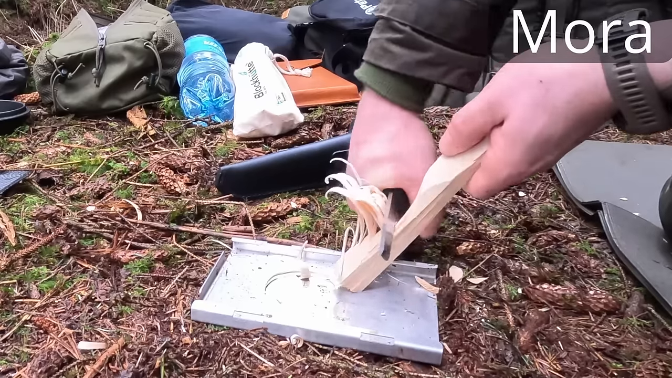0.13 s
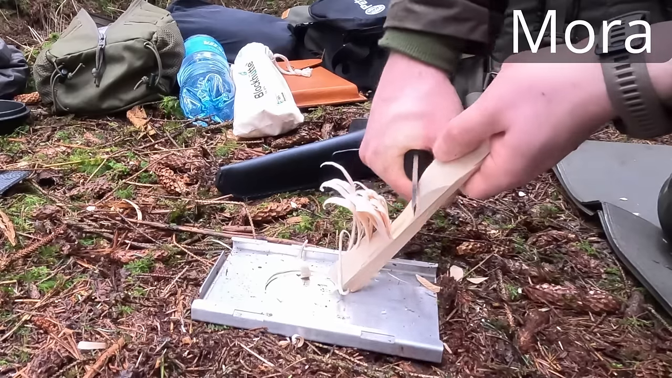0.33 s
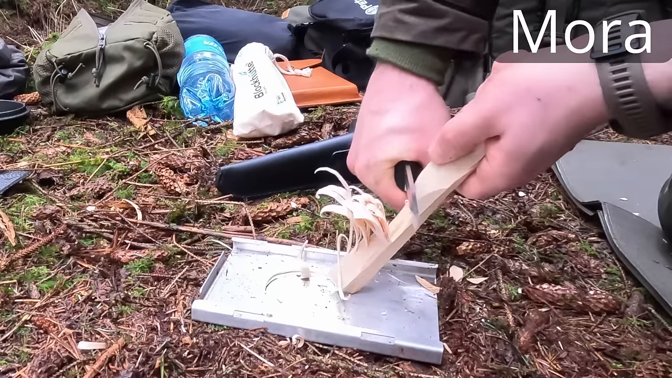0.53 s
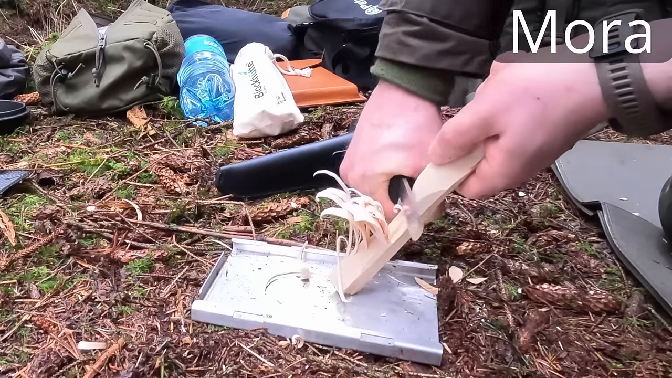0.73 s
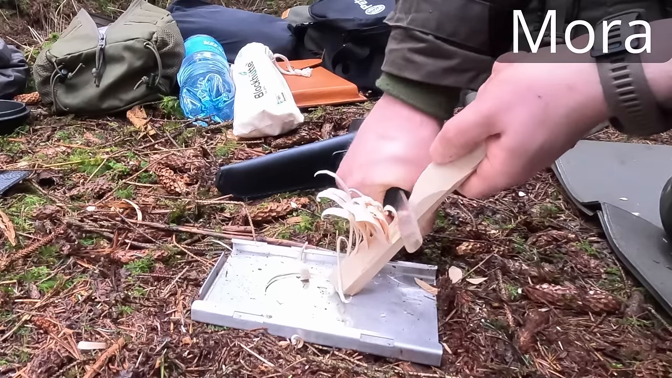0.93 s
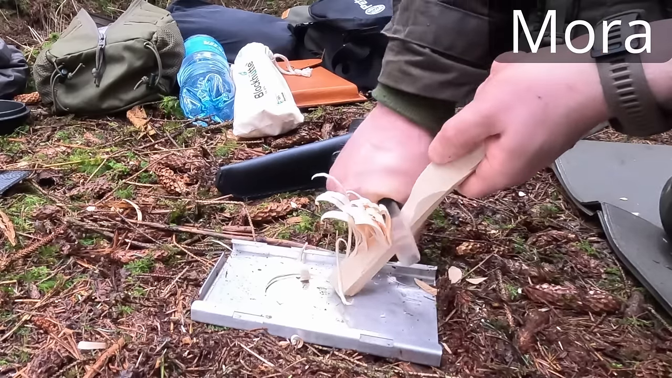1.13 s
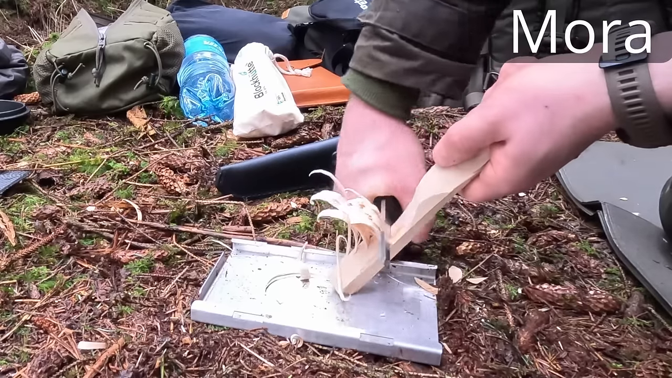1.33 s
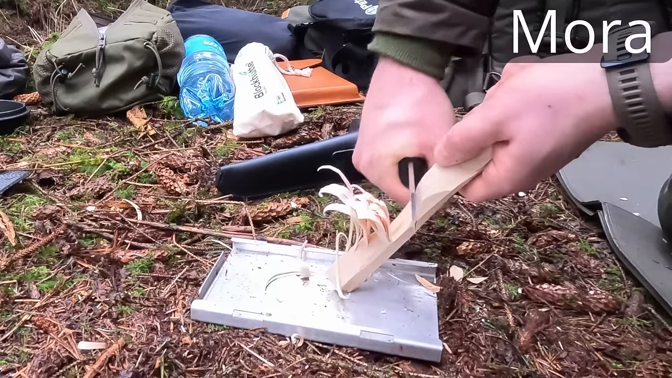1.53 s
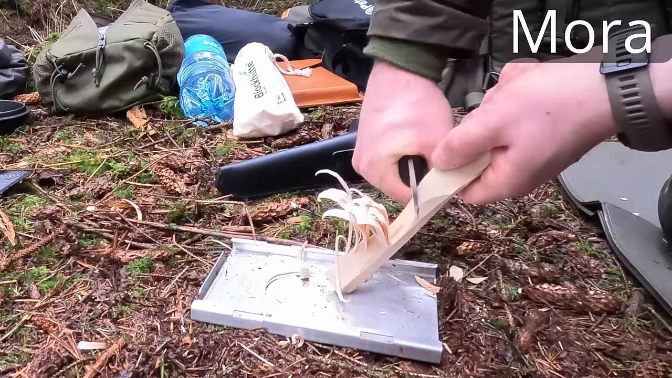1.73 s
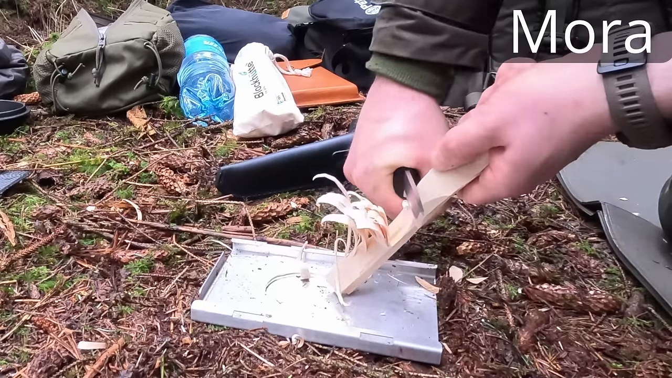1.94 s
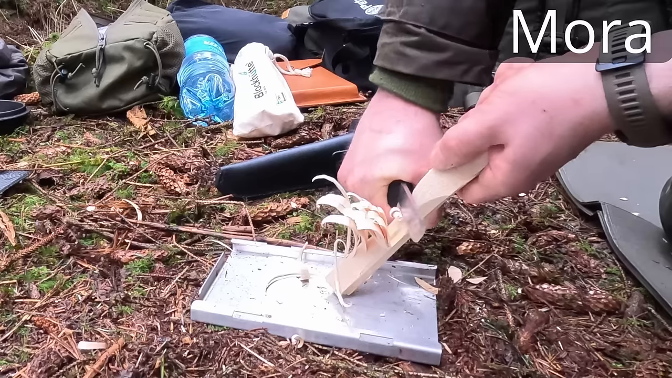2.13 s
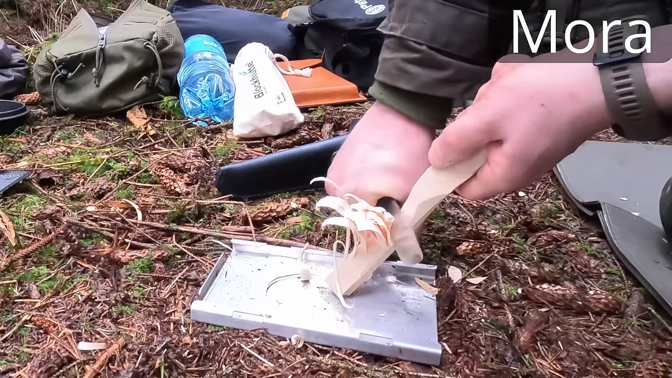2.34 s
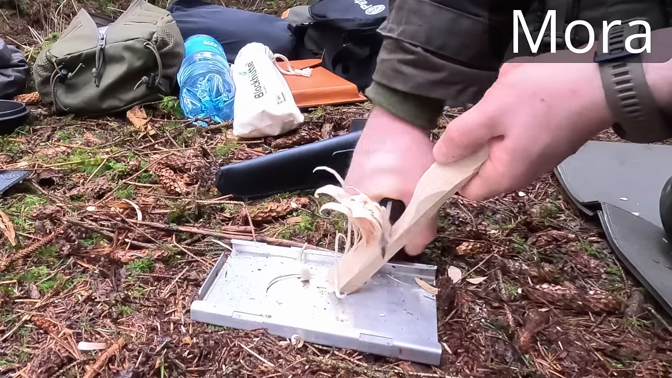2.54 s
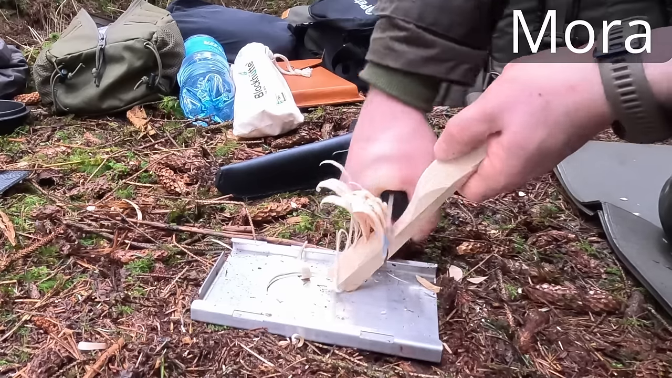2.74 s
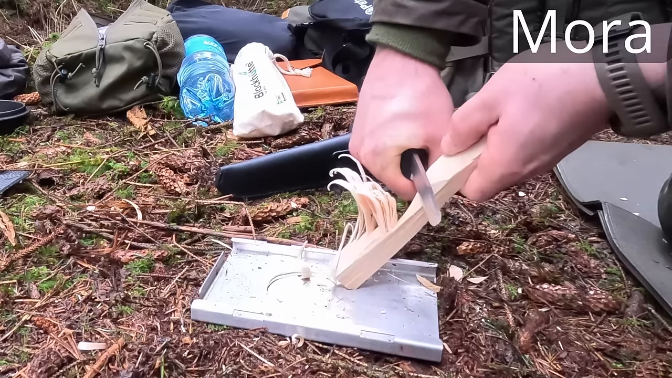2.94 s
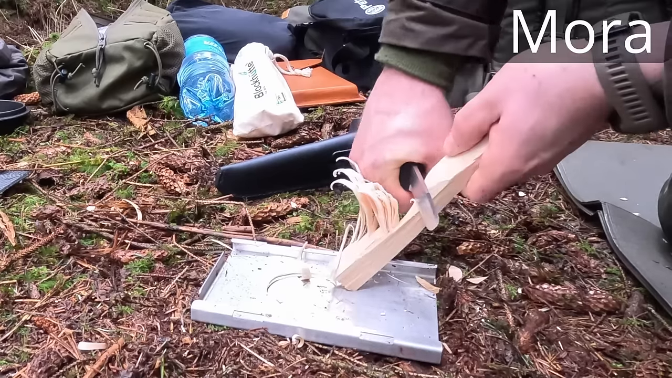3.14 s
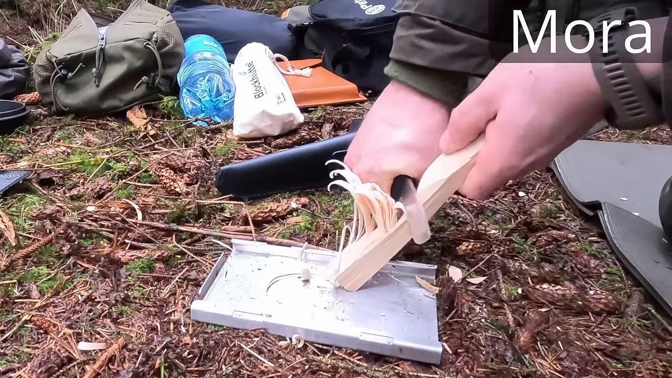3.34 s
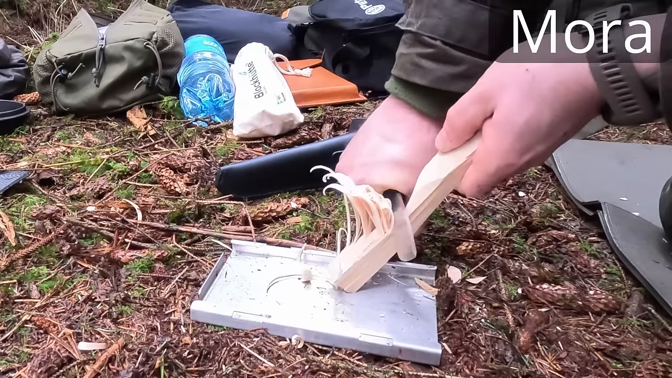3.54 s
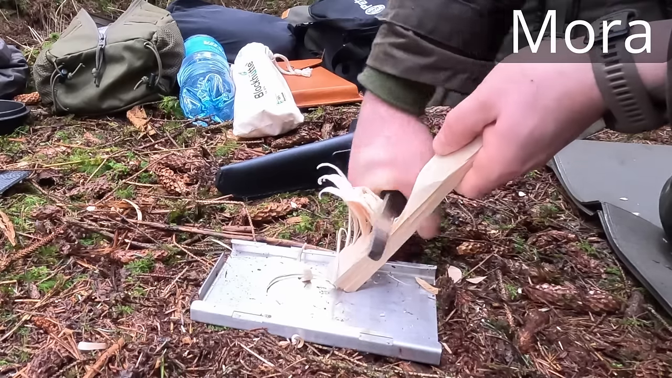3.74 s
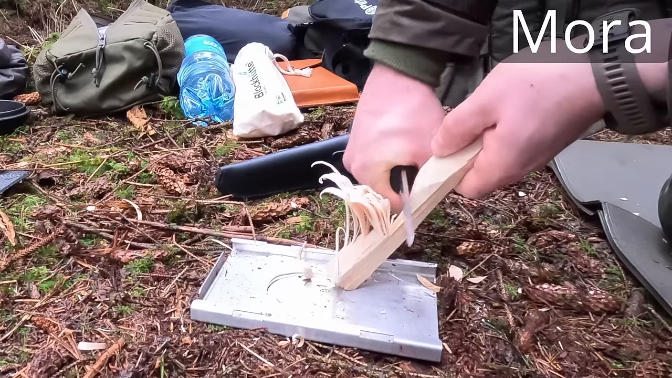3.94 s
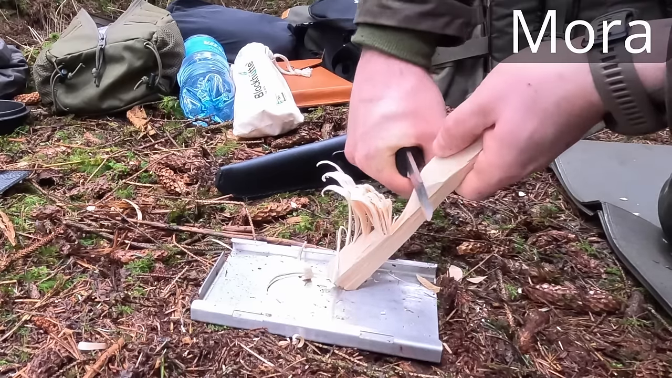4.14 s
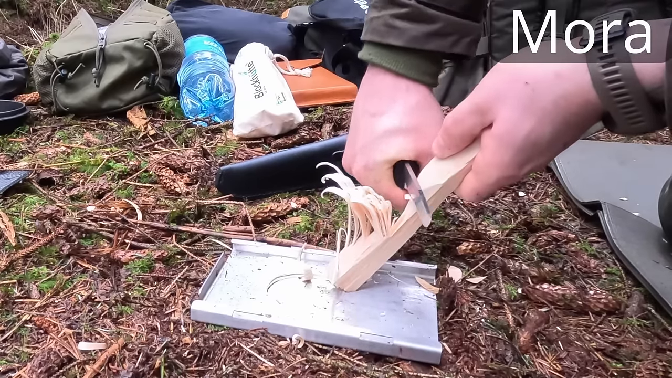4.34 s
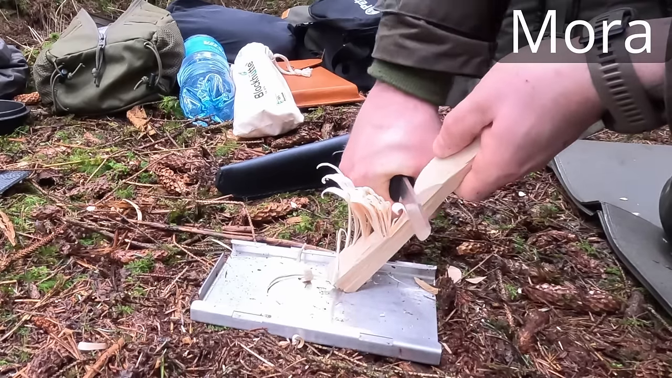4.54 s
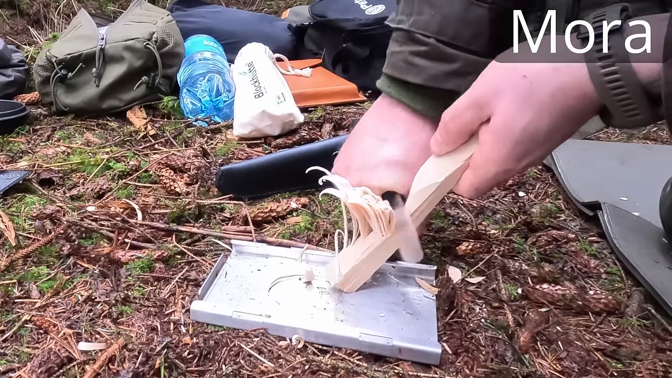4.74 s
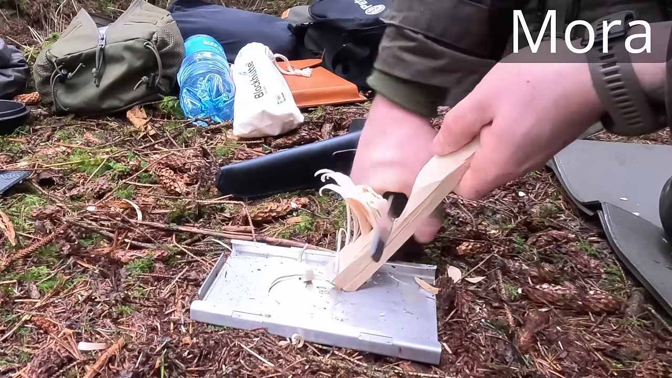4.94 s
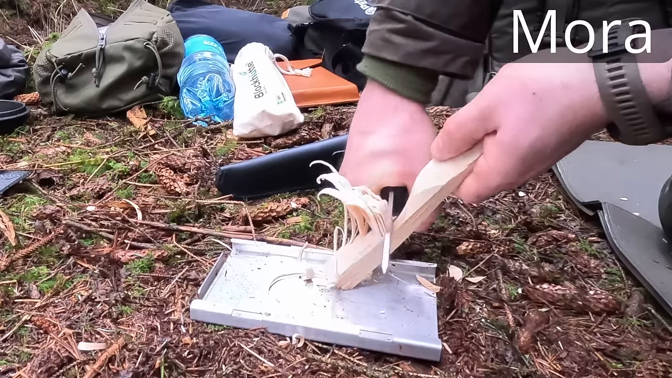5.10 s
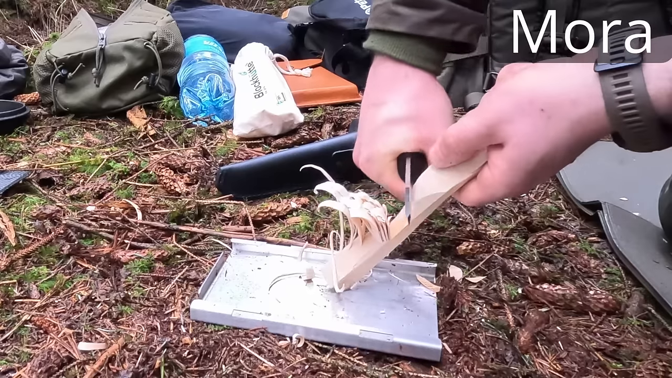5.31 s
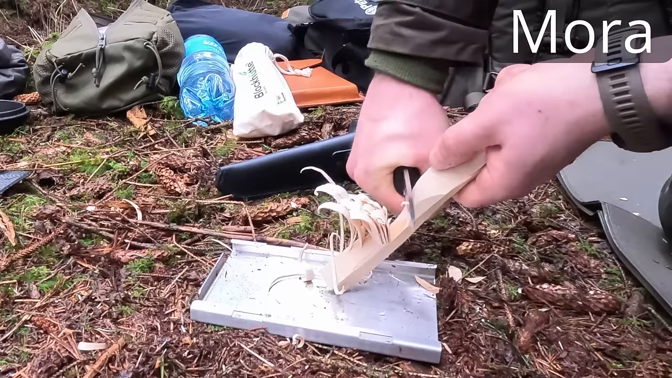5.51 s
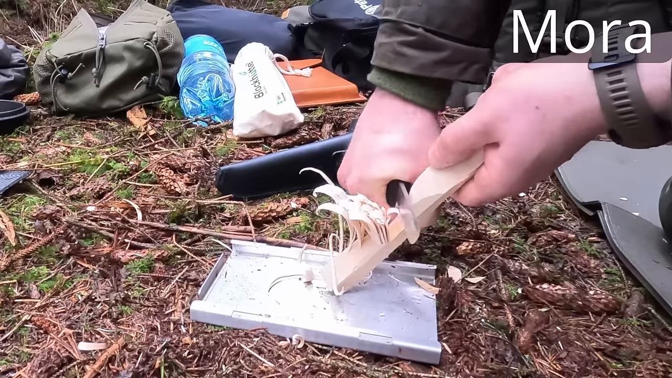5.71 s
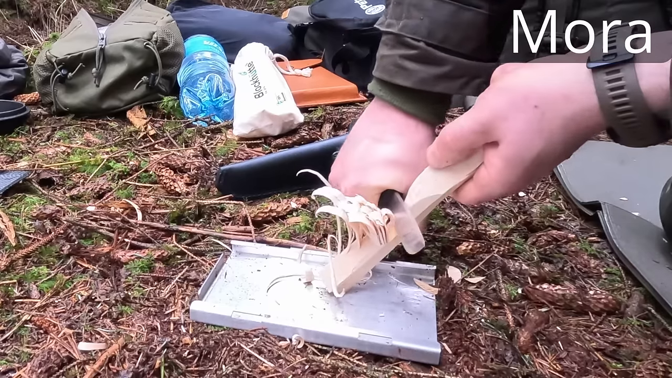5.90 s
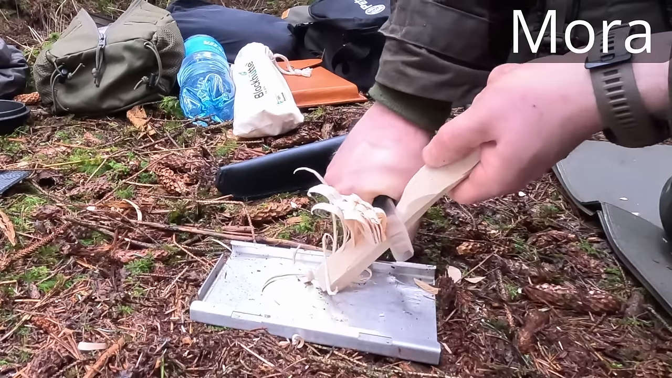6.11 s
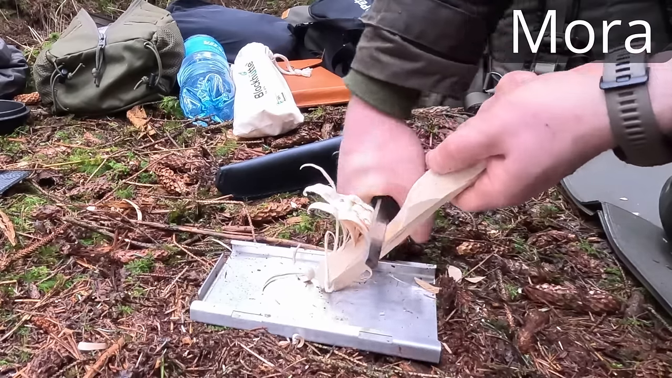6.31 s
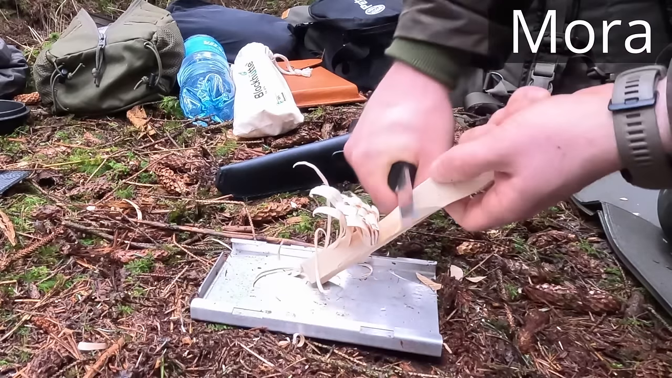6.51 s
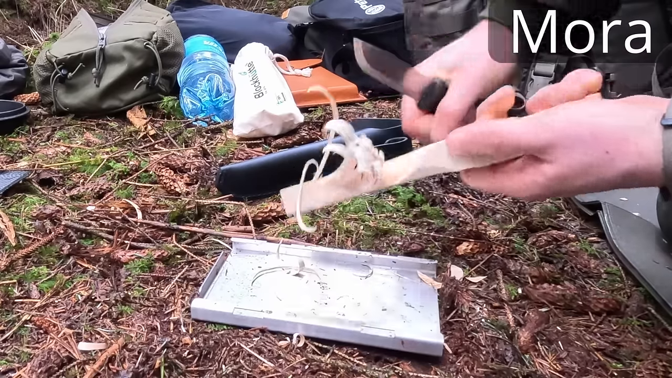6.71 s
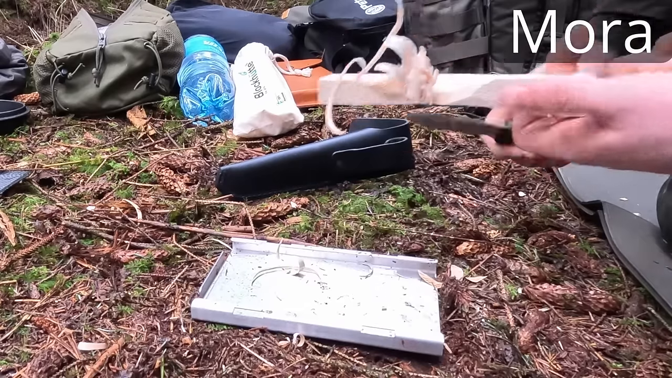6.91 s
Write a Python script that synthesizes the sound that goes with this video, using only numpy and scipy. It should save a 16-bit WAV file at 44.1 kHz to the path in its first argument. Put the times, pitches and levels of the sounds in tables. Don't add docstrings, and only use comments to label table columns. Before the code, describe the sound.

A close, dry, centred microphone catches a blade shaving a braced wooden stick. The first stroke is lighter, the later ones heavier, each about half a second of catching and slipping, splintering crackle and dull ground thumps. Quieter gaps hold blade slides, brittle ticks and short skids. Thin bird whistles and chirps are heard only early on. Distant traffic rumble and faint air continue beneath, and cloth rubs near the end.

```python
import sys
import numpy as np
from scipy import signal
from scipy.fft import rfft, irfft, next_fast_len
from scipy.io import wavfile
from scipy.ndimage import uniform_filter1d

SR = 44100
rng = np.random.default_rng(int(sys.argv[2]) if len(sys.argv) > 2 else 0)


def how_loud(loudness_db):
    steps = np.asarray(loudness_db, float) / 20
    return 10 ** steps


def wav_out(sig):
    wavfile.write(sys.argv[1], SR, np.round(np.clip(np.atleast_2d(sig).T, -1, 1) * 32767).astype(np.int16))


N = 311346
FAST = next_fast_len(N)
CONTROL_STEP = 32


def curve(table, at):
    x, y = np.array(table).T[:2]
    return np.interp(np.log(at + 1), np.log(x + 1), y)


def unit(x):
    return x / np.sqrt(np.mean(x ** 2))


def coloured(x, table):
    f_hz = np.arange(FAST // 2 + 1) * SR / FAST
    return unit(irfft(rfft(x, FAST) * how_loud(curve(table, f_hz)), FAST)[:N])


def ring(x, modes, detune):
    out = 0
    for k, (f_hz, width_hz, db) in enumerate(modes):
        b, a = signal.iirpeak(min(f_hz * detune, .45 * SR), f_hz / width_hz, fs=SR)
        out = out + (-1) ** k * how_loud(db) * signal.lfilter(b, a, x)
    return out


def walk(rate_hz):
    k = int(SR / rate_hz)
    held = np.repeat(rng.standard_normal(N // k + 1), k)
    return unit(uniform_filter1d(held, k)[:N])


def grainy(scatter_db, size):
    strength_db = scatter_db * np.minimum(rng.exponential(size=size), 4)
    return rng.standard_normal(size) * how_loud(strength_db)


def tear(length_s, grain, tail, tail_s):
    t = np.arange(len(grain)) / SR / max(length_s, 2e-4)
    swell = t ** 2 * np.exp(-t)
    crackle = (1 - np.exp(-t)) * np.exp(-t * length_s / tail_s)
    return grain * (swell + tail * crackle)


def add(out, t_s, x, db):
    i = int((t_s - .0015) * SR)
    out[i:i + len(x)] += (x * how_loud(db) / np.abs(x).max())[:N - i]


def clock():
    return np.arange(0, N + CONTROL_STEP, CONTROL_STEP) / SR


def fine(control):
    return np.interp(np.arange(N) / SR, clock(), control)


def hold(start_s, length_s, attack_s, release_s):
    t = clock() - start_s
    rise = np.minimum(t, 0) / max(attack_s, 1e-3)
    fall = np.maximum(t - length_s, 0) / max(release_s, 1e-3)
    return np.exp(rise - fall)


def mix(*gains):
    return fine(10 * np.log10(sum(g ** 2 for g in gains) + 0 * clock()))


def partner(db, way, entry_db, stop_db, loss, scatter_db):
    usual_slip_db = -22
    rel_db = entry_db + (stop_db - entry_db) * way - loss * (db - usual_slip_db)
    return db + rel_db + scatter_db * rng.standard_normal()


# t/s, length/s, bite level/dB, weight on ground level/dB, dryness/dB
STROKES = [
    (0.657, 0.57, -44, -51, 3),
    (1.903, 0.57, -45.5, -37, 3.5),
    (3.162, 0.55, -47, -35.5, -5),
    (4.402, 0.504, -45, -33.5, 1.5),
    (5.582, 0.4, -43, -34, 1.5),
]
# t/s, stick ring level/dB, low ring rel level/dB, swell/ms, brightness/dB
SLIPS_1 = [(0.655, -39, 7, 1.75, -8), (0.666, -30, 8, 1.3, -6), (0.703, -39, 6, 1.2, -8),
           (0.716, -40, 6, 1.4, -6), (0.69, -33, 6.5, 1.6, -7), (0.786, -21, -1.5, 1.44, -3.5),
           (0.816, -18.5, -2, 1.26, -4), (0.839, -23.5, 1, 1.9, -2), (0.851, -30, 1.5, 1.9, 1),
           (0.879, -15.5, -8, 1.36, -5.5), (0.94, -21.5, -6.5, 1.27, -5), (1.006, -34, -17, 1.3, -2),
           (1.025, -20.5, -1, 1.82, -1.5), (1.064, -23, -12, 2.1, -5), (1.127, -14.5, -11, 1.7, -3),
           (1.167, -19, -5.5, 1, -3), (1.175, -17.5, -4.5, 1.54, 1)]
SLIPS_2 = [(1.903, -46, 10, 1.23, 3), (1.926, -45, 11, 1.5, -4), (1.94, -19, -2, 1.27, -11),
           (1.948, -33, -4, 1.2, 4), (1.962, -14, -2.5, 0.67, -2), (1.978, -11, -4.5, 0.92, -0.5),
           (2.001, -11, -2, 0.82, -6.5), (2.004, -9, -6.5, 0.97, 0.5), (2.016, -42, 0, 1.4, 3),
           (2.03, -46, 3, 1.5, 0), (2.065, -13.5, -3.5, 1.35, -1), (2.075, -27, 6.5, 0.9, -8),
           (2.086, -28, -3, 1, -3), (2.097, -19, -1.5, 1.6, -1), (2.114, -13, -5.5, 1.42, -3.5),
           (2.136, -11, -6.5, 1.5, -4.5), (2.158, -16.5, -5, 2.1, -4), (2.183, -16.5, -5, 1.38, -3.5),
           (2.211, -18.5, -2.5, 1.44, 0), (2.268, -31, 3.5, 1.44, 0), (2.299, -12, -7, 1.51, -3),
           (2.356, -28, -0.5, 1.7, -6), (2.383, -21, -7, 1.8, 0), (2.411, -23, -2, 1.84, -4),
           (2.445, -13.5, -8.5, 2.34, 1.5), (2.453, -18, -4.5, 1.56, -4), (2.476, -23.5, -16, 1.8, -4)]
SLIPS_3 = [(3.171, -32, -2, 1.57, 0.92), (3.208, -26.5, 0, 1.83, 1), (3.234, -31, 0, 1.27, 1),
           (3.258, -33, -5, 1.5, 0), (3.283, -28.5, -4, 1.7, 0.099), (3.341, -23.5, 5, 0.76, 0.34),
           (3.373, -28, -4, 1.8, 0), (3.394, -22.5, 1, 1.38, 0.29), (3.422, -28.5, 3, 1.66, 0),
           (3.442, -15, -5.5, 0.97, 0), (3.473, -10.5, -12, 1.82, 0), (3.52, -25.5, -10, 2.6, 0),
           (3.567, -11, -14, 2.45, 0), (3.614, -14, -11, 3.2, 0.51), (3.785, -27.5, 3.5, 1.37, 0)]
SLIPS_4 = [(4.359, -36, 7.5, 1.34, 2), (4.374, -44, 2, 1.6, 3), (4.396, -43, 18, 1.64, 8),
           (4.413, -22, 5, 1.14, 0), (4.424, -27.5, 5.5, 1.27, -5), (4.436, -29, -4, 1.1, 0),
           (4.451, -19, -5, 1.4, 0), (4.471, -32, -15, 1.5, 2), (4.49, -25, 1.5, 1.26, -3),
           (4.513, -23.5, 5, 1.5, 3.5), (4.55, -14.5, -2, 1.43, 3), (4.559, -20, 1.5, 1.27, -2.5),
           (4.577, -26, 5.5, 0.98, 0), (4.597, -12, -2.5, 1.7, 3), (4.621, -27, -1, 1.63, -1),
           (4.645, -26.5, -21, 1.76, 2), (4.691, -16.5, -1.5, 2.1, 2), (4.724, -41, 4, 1.5, 2),
           (4.752, -10.5, -8, 1.46, 1.5), (4.791, -12, -18, 1.9, -5), (4.855, -8.5, -15, 2.46, 0),
           (4.884, -17.5, -4.5, 3.2, 5.5)]
SLIPS_5 = [(5.545, -33.5, 2, 1.46, 0.5), (5.568, -42, 9, 1.1, -9), (5.588, -21, -1, 1.03, -4),
           (5.599, -13, -4, 0.99, -3.5), (5.608, -14, -2, 1.14, 0), (5.621, -32, 5, 1.6, -8),
           (5.63, -23, -5, 1.9, -1), (5.646, -27.5, 0, 1.2, 2.5), (5.659, -28.5, 4, 1.9, -8),
           (5.679, -12.5, -3, 0.92, 2), (5.688, -32, 3, 1.5, -3), (5.7, -9.5, -6.5, 1, -1.5),
           (5.726, -17, -2.5, 1.17, -4), (5.749, -10, -5.5, 0.82, -2.5), (5.774, -28, 5, 1.45, 0),
           (5.793, -20, -7.5, 1.92, -0.5), (5.82, -34, 4, 1.6, 3), (5.871, -26, -3, 1.5, -1),
           (5.898, -20, -6.5, 1.74, -5), (5.937, -14, -4, 1.83, 0), (5.961, -30, -3, 1.4, -2),
           (6.071, -19, -22, 1.7, -0.5), (6.109, -18, -9, 1.6, -6)]
SLIPS = (SLIPS_1, SLIPS_2, SLIPS_3, SLIPS_4, SLIPS_5)
# f/Hz, width/Hz, level/dB
LOW_RING = [(168, 62, 0), (331.4, 94, 2), (497.3, 45, 3), (786, 197, -6)]
STICK_RING = [(941, 97, 8.5), (1310, 190, -10.5), (780, 440, -17)]
UPPER_RING = [(1556, 160, 11.5), (2207, 230, 13.6), (2980, 66, 7.5)]
# f/Hz, width/Hz, level/dB
CHIP = [(3445, 490, 5.5), (4390, 480, 1), (5600, 1200, -8.5), (7840, 3900, -13)]
# f/Hz, width/Hz, level/dB
TOP = [(9950, 2000, 6.2), (13700, 3800, 3.7)]


def slip(out, t_s, db, low_db, swell_ms, bright_db, way, dry_db):
    t = np.arange(6000) / SR
    swell_s = max(swell_ms, .4) / 1000
    force = tear(swell_s, grainy(1.44, size=6000), tail=0.26, tail_s=0.0096)
    detune = 1 + 0.016 * rng.standard_normal(4)
    late = np.maximum(t - 1.268 * swell_s, 0) / 0.00022
    jolt = how_loud(15.5) * np.exp(-(swell_s * 1000 - .7) / 0.63)
    blow = force - jolt * late * (1 - late / 2) * np.exp(-late)
    chip = force * (0.23 + np.exp(-t / swell_s / 2.8))
    t_s = t_s + 0.000996 - 0.7 * swell_s
    add(out, t_s, ring(blow, STICK_RING, detune[0]), db - 6.5)
    add(out, t_s, ring(blow, LOW_RING, detune[1]), db + low_db)

    upper_db = partner(db, way, entry_db=-12.5, stop_db=-15.5, loss=0.26, scatter_db=-3)
    add(out, t_s, ring(force, UPPER_RING, detune[3] ** 1.65), upper_db + bright_db)
    snap_db = partner(db, way, entry_db=-16.5, stop_db=-13.5, loss=0.5, scatter_db=1)
    add(out, t_s, ring(chip, CHIP, detune[1] ** 3.9), snap_db + dry_db + bright_db)
    top = ring(chip, TOP[:1], 0.82) - how_loud(-6.5) * ring(chip, TOP[1:], 0.95)
    top_db = partner(db, way, entry_db=-39, stop_db=-42, loss=0.3, scatter_db=3)
    add(out, t_s, top, top_db + bright_db)

    turns = np.cumsum(68 * detune[2] + 40 * np.exp(-t / 0.0098)) / SR
    thud = np.sin(2 * np.pi * (turns + 0.19)) * (1 - np.exp(-t / 0.0028)) * np.exp(-t / 0.03)
    thud_db = partner(db, way, entry_db=-10, stop_db=-1.5, loss=0.22, scatter_db=1.5)
    add(out, t_s + 0.85 * swell_s, thud, thud_db - 3.5 + 4 * (min(swell_ms, 1.9) - 1.6))


def slips():
    out = np.zeros(N)
    for (start_s, length_s, _, _, dry_db), table in zip(STROKES, SLIPS):
        for t_s, db, low_db, swell_ms, bright_db in table:
            way = np.clip((t_s - start_s) / length_s, 0, 1)
            slip(out, t_s, db, low_db, swell_ms, bright_db, way, dry_db)
    return out


# f/Hz, width/Hz, level/dB
SNAP = [(1440, 560, -3.5), (2690, 1930, -0.5), (3600, 1260, 3.5), (4990, 640, -3), (5730, 200, 0.5),
        (7500, 1600, -7)]


def splinters(bite_db):
    cutting = fine(sum(hold(s, length_s, 0, 0) for s, length_s, *_ in STROKES)) > .5
    hits = (rng.random(N) < 300 / SR) * cutting * how_loud(4 * rng.standard_normal(N))
    t = np.arange(400) / SR / 0.0019
    force = signal.fftconvolve(hits, t * np.exp(-t))[:N] * rng.standard_normal(N)
    snap, upper = ring(force, SNAP[1:4], 0.81), ring(force, UPPER_RING, 0.94)
    return how_loud(bite_db - 23) * unit(snap + how_loud(8) * upper + how_loud(-29) * ring(force, TOP, 0.61))


# t/s, top level/dB, snap rel level/dB
TICKS = [(0.073, -36.5, 8.5), (0.22, -25.5, 7), (1.127, -48, 20.5), (1.168, -31, 3.5), (1.3174, -44.5, 5),
         (1.384, -30.5, 5), (2.4519, -24, 3), (2.48, -50, 20), (2.678, -41, 8.5), (2.686, -38, 15.5),
         (2.7337, -40, 8.5), (2.755, -45, 9.5), (2.8765, -47, 11), (3.623, -35, 9), (3.653, -36, 7.5),
         (3.7878, -33, 7.5), (3.831, -39.5, 12), (3.963, -51, 10.5), (4.815, -51, 13), (4.929, -44, 10.5),
         (5.0394, -36, 15.5), (5.076, -26, 4.5), (5.1111, -40.5, 17), (6.069, -40.5, 10),
         (6.154, -33.5, 3.5), (6.31, -49, 9.5), (6.33, -32.5, 10), (6.378, -40, 15.5), (6.398, -39, 14),
         (6.442, -43.5, 10)]
# t/s, top level/dB, snap rel level/dB
FIBRES = [(0.1261, -47, -2), (0.172, -50, -10), (1.219, -44.5, 6), (1.335, -48.5, 12.5), (1.421, -44.5, 6),
          (1.866, -61, 15), (1.886, -64, 12), (2.806, -54, -2), (2.822, -60, 13), (3.677, -46, 5),
          (3.798, -35, 10), (4.995, -49, -1), (5.01, -53, 7), (5.258, -49, 3), (0.101, -48, 9),
          (0.18, -51, -3), (2.438, -39, 11), (2.713, -52, 4), (2.744, -52, 0), (5.106, -50, 2),
          (6.109, -40.5, 5), (6.262, -58, 9), (6.339, -40, 11.5), (6.459, -60, 21.5)]


def ticks():
    out = np.zeros(N)
    for t_s, db, snap_db in TICKS + FIBRES:
        force = tear(0.00045, grainy(2.6, size=2000), tail=0.25, tail_s=0.0073)
        detune = 1 + 0.036 * rng.standard_normal()
        add(out, t_s, ring(force, TOP[:1], 0.9) - how_loud(-5.5) * ring(force, TOP[1:], 0.935), db)
        add(out, t_s, ring(force, SNAP, detune), db + snap_db)
    return out


# f/Hz, width/Hz, level/dB
KNOCK = [(1150, 560, -6), (2320, 510, -4)]


def knock():
    out = np.zeros(N)
    force = tear(0.00074, grainy(3.3, size=2000), tail=.3, tail_s=0.0033)
    add(out, 3.7865, ring(force, KNOCK, 0.98), -18)
    return out


# t/s, length/s, level/dB, stick share/dB
SLIDES = [(0.0, 0.505, -59, -6), (0.336, 0.04, -60, -2), (1.22, 0.52, -62.5, -12), (1.49, 0.19, -55.5, -17),
          (1.79, 0.1, -64, 4), (2.689, 0.32, -61.5, 10), (3.18, 0.056, -62, -6), (3.858, 0.22, -60, 12),
          (4.3, 0.071, -63, 14), (5.12, 0.041, -60, -2), (5.192, 0.18, -56.5, 7.5), (5.247, 0.022, -59, 11),
          (5.476, 0.053, -64, 13), (6.02, 0.088, -61, 15.5), (6.438, 0.76, -57, 9.5)]
# t/s, length/s, level/dB, groan rel level/dB
SCRAPES = [
    (0.63, 0.056, -57.5, 17),
    (1.6, 0.046, -68, 5),
    (3.156, 0.083, -55, 10.5),
    (4.305, 0.16, -59.5, 1),
    (6.1, 0.052, -57, 2),
    (3.32, 0.12, -56, 7),
    (4.76, 0.15, -53, 8),
    (2.7, 0.13, -54.5, 3),
]


def effort():
    cut = entry = slide = drag = rustle = bright = strain = scrape = groan = 0
    attack_s = 0.024
    for t_s, length_s, bite_db, _, _ in STROKES:
        cut = cut + how_loud(bite_db) * hold(t_s, length_s, attack_s, 0.01)
        entry = entry + how_loud(bite_db + 3.5) * hold(t_s + attack_s, 0, attack_s, 0.048)
    for t_s, length_s, db, share_db in SLIDES:
        shape = how_loud(db) * hold(t_s + 0.01, length_s - 0.01, 0.01, 0.038)
        slide = slide + shape
        drag = drag + how_loud(share_db) * shape
    for t_s, db, snap_db in TICKS:
        shape = how_loud(db) * hold(t_s, 0, 0.016, 0.016)
        rustle = rustle + how_loud(snap_db - 23.5) * shape
        bright = bright + how_loud(-23) * shape
    for table in SLIPS:
        for t_s, db, _, _, bright_db in table:
            strain = strain + how_loud(0.69 * (db + 22) + bright_db - 22) * hold(t_s, 0, 0.0046, 0.008)
    for t_s, length_s, db, groan_db in SCRAPES:
        scrape = scrape + how_loud(db) * hold(t_s, length_s, 0.0076, 0.02)
        groan = groan + how_loud(db + groan_db) * hold(t_s, length_s, 0.008, 0.014)
    edge_db = mix(how_loud(-69), how_loud(-33.5) * strain, how_loud(-11) * cut, how_loud(-33) * entry, slide, rustle)
    top_db = mix(how_loud(-88), how_loud(-52) * strain, how_loud(-25.5) * cut, how_loud(-15) * slide, bright)
    bite_db = mix(how_loud(-78), cut, entry, drag)
    scrape_db = mix(how_loud(-14.5) * entry + 1e-9, scrape)
    return edge_db, top_db, bite_db, scrape_db, mix(1e-9 + groan)


# f/Hz, level/dB per Hz
EDGE = [(1350, -1), (2300, -5.5), (2930, 4), (3910, 1), (5220, -4.5), (8000, -9.5), (11000, -47),
        (16000, -60)]
# f/Hz, width/Hz, level/dB
GROAN = [(307, 91, 6.5), (480, 45, -9.5)]


def rasp():
    edge_db, top_db, bite_db, scrape_db, groan_db = effort()
    chatter = 1.37 * np.tanh(walk(160) / 1.34) * np.clip((bite_db + 50) / 8, .25, 1.3)
    grain = grainy(2.9, size=N)
    edge = how_loud(edge_db - 2 + 5.9 * chatter) * coloured(grain, EDGE)
    top = how_loud(top_db - 4.5 + 4.5 * chatter) * unit(ring(ring(grain, TOP, 1), TOP, 0.85))
    stick = unit(ring(grain, LOW_RING, 1))
    stick = stick + 0.79 * unit(ring(grain, STICK_RING, 0.97))
    stick = stick + 0.37 * unit(ring(grain, UPPER_RING, 0.98))
    bite = how_loud(bite_db - 7 + 9.1 * chatter) * stick
    hard = ring(grain, UPPER_RING[1:2], 1.02) + how_loud(-14.5) * ring(grain, SNAP[2:3], 0.84)
    scrape = how_loud(scrape_db + 2.2 * chatter) * unit(hard)
    groan = how_loud(groan_db + 4.1 * chatter) * unit(ring(grain, GROAN, 0.97))
    return edge + top + bite + scrape + groan + splinters(bite_db)


# t/s, length/s, level/dB
SKIDS = [
    (3.146, 0.11, -75),
    (3.996, 0.042, -63),
    (5.355, 0.062, -59),
    (6.58, 0.057, -55.5),
]
# f/Hz, width/Hz, level/dB
BLADE = [(2840, 400, -3), (3600, 170, 1), (4300, 120, -2), (5750, 620, -3), (7800, 540, -6.5)]


def skids():
    gain = sum(how_loud(db) * hold(t_s, length_s, 0.012, 0.0043) for t_s, length_s, db in SKIDS)
    sing = unit(ring(ring(grainy(1, size=N), BLADE, 0.98), BLADE, 0.98))
    return fine(gain) * sing


# f/Hz, level/dB per Hz
SLEEVE = [(290, -29), (500, -4), (1000, -6), (3250, -10), (8000, -24), (11200, -30.5), (13100, -31),
          (15500, -44)]


def sleeve():
    swell = how_loud(-44.5) * np.exp(-.5 * ((clock() - 6.85) / 0.11) ** 2)
    return fine(swell) * how_loud(walk(26)) * coloured(rng.standard_normal(N), SLEEVE)


# t/s, length/s, top f/Hz, end f/Hz, level/dB
WHISTLES = [
    (0.031, 0.047, 7100, 6300, -53),
    (0.196, 0.083, 7680, 7400, -50.5),
    (0.3, 0.15, 7950, 8000, -49.5),
]


def whistles():
    scoop_s, fade_db_per_s = 0.0081, 150
    for t_s, length_s, top_hz, end_hz, db in WHISTLES:
        settle_s = min(0.0306, length_s / 3.5 + scoop_s / 2)
        fade_db = fade_db_per_s * (length_s - settle_s)
        times = t_s + np.array([0, scoop_s, settle_s, (settle_s + length_s) / 2, length_s])
        pitches = np.array([4300, .94 * top_hz, top_hz, .75 * top_hz + .25 * end_hz, end_hz])
        yield times, pitches, db + np.array([-14, -2.5, 0, -fade_db / 2.2, -fade_db])


# t/s, length/s, top f/Hz, end f/Hz, level/dB
ARCHES = [
    (1.261, 0.029, 4020, 3030, -52),
    (1.447, 0.035, 3676, 3480, -50.5),
    (1.54, 0.028, 3400, 2930, -51),
    (1.635, 0.046, 3770, 3340, -55.5),
]


def arches():
    peak = 0.488
    for t_s, length_s, top_hz, end_hz, db in ARCHES:
        times = t_s + length_s * np.array([0, peak, (1 + peak) / 2, 1])
        pitches = np.array([.89 * top_hz, top_hz, .75 * top_hz + .25 * end_hz, end_hz])
        yield times, pitches, db + np.array([-4.5, 0, -1.5, -4.5])


# t/s, length/s, from f/Hz, to f/Hz, level/dB
GLIDES = [(0.701, 0.04, 6040, 4300, -53), (0.735, 0.025, 4300, 3500, -57), (0.756, 0.026, 3520, 2960, -58),
          (0.729, 0.023, 4440, 4270, -50), (1.176, 0.022, 4440, 4530, -55),
          (1.192, 0.0088, 4800, 5000, -53), (1.472, 0.0084, 3600, 3070, -59),
          (1.285, 0.012, 5800, 4700, -57), (1.35, 0.018, 3140, 3600, -49.5),
          (1.365, 0.021, 4740, 4400, -53), (1.468, 0.019, 5560, 4360, -57),
          (1.557, 0.024, 4500, 4250, -46.5), (1.57, 0.028, 2900, 2720, -56)]


def glides():
    for t_s, length_s, from_hz, to_hz, db in GLIDES:
        times = t_s + length_s * np.array([0, .5, 1])
        pitches = np.array([from_hz, (from_hz + to_hz) / 2, to_hz])
        yield times, pitches, db + np.array([-4.5, 0, -4.5])


# t/s, length/s, from f/Hz, to f/Hz, level/dB
SWOOPS = [
    (0.528, 0.076, 6300, 3220, -49),
]


def swoops():
    for t_s, length_s, from_hz, to_hz, db in SWOOPS:
        times = t_s + length_s * np.array([0, 0.59, 0.62, 1])
        pitches = np.array([from_hz, to_hz + 0.14 * (from_hz - to_hz), to_hz, to_hz])
        yield times, pitches, db + np.array([-2.5, -1.5, -2.5, -4.5])


def bird():
    out, waver = np.zeros(N), walk(251)
    for times, pitches, db in [*whistles(), *arches(), *glides(), *swoops()]:
        i = int(times[0] * SR)
        t = np.arange(i, int(times[-1] * SR)) / SR
        t = times[0] + np.arange(int(times[-1] * SR) - i) / SR if len(t) == 0 else t
        f_hz = uniform_filter1d(np.interp(t, times, pitches), int(0.005 * SR), mode="nearest")
        phase = 2 * np.pi * np.cumsum(f_hz * (1 + 0.0089 * waver[:len(t)])) / SR
        fade = np.minimum(1, np.minimum(t - times[0], times[-1] - t) / 0.003)
        octave = how_loud(-16 if pitches.max() < 4200 else -25) * (pitches.min() < 4000)
        gain = how_loud(np.interp(t, times, db) + 8 + 2.15 * waver[i:i + len(t)]) * fade
        out[i:i + len(t)] += gain * (np.sin(phase) + octave * np.sin(2 * phase))
    t = np.arange(SR // 2) / SR
    trunks = rng.standard_normal(len(t)) * np.exp(-t / 0.045) * (t > .004)
    return out + how_loud(-36) * signal.fftconvolve(out, trunks)[:N]


# f/Hz, level/dB per Hz
RUMBLE = [(12, -64), (20, 6), (59, -0.5), (202, -10), (300, -20), (390, -22.5), (660, -120)]
AIR = [(150, -56), (250, -3), (420, -8.5), (492, -7), (628, -9), (986, -9.5), (1350, -12), (2600, -24.5),
       (3380, -69), (5720, -120)]


def rumble_and_air():
    lean = 0
    for t_s, length_s, _, weight_db, _ in STROKES:
        push = np.clip((clock() - t_s) / length_s, 0, 1) ** 0.2
        lean = lean + how_loud(weight_db) * push * hold(t_s, length_s, 0, 0.085)
    rumble = how_loud(mix(how_loud(-36), lean) + 0.5) * coloured(rng.standard_normal(N), RUMBLE)
    return rumble + how_loud(-48.5) * coloured(rng.standard_normal(N), AIR)


def scene():
    mono = slips() + ticks() + knock() + rasp() + skids() + sleeve() + bird() + rumble_and_air()
    return np.tile(mono, (2, 1))


def roll_off(x):
    return signal.sosfilt(signal.butter(12, 16361, fs=SR, output="sos"), x)


# f/Hz, left lead/rad
PORTS = [(10900, 0), (11600, -0.7), (12100, -2.1), (12700, -3.1), (13800, -4.4), (15200, -6.1),
         (15900, -6.5)]


def record(dry):
    dry = signal.sosfilt(signal.ellip(6, .5, 50, 15400, fs=SR, output="sos"), dry)
    f_hz = np.arange(FAST // 2 + 1) * SR / FAST
    top = np.clip((f_hz - 10900) / 1200, 0, 1)
    left = how_loud(3.7 * top) * np.exp(1j * np.interp(f_hz, *np.array(PORTS).T))
    spectrum = rfft(dry, FAST)
    ports = irfft(spectrum * np.array([left, np.ones_like(left)]), FAST)[:, :N]
    share = (top + 0.12 * np.clip(f_hz / 9000, 0, 1) ** 1.54) * (f_hz < 15500)
    loose = irfft(spectrum * share, FAST)[:, :N]
    scatter = np.array([walk(240), walk(450)]) * loose
    return roll_off(ports + scatter)


dry = scene()
out = record(dry)
wav_out(out)
```